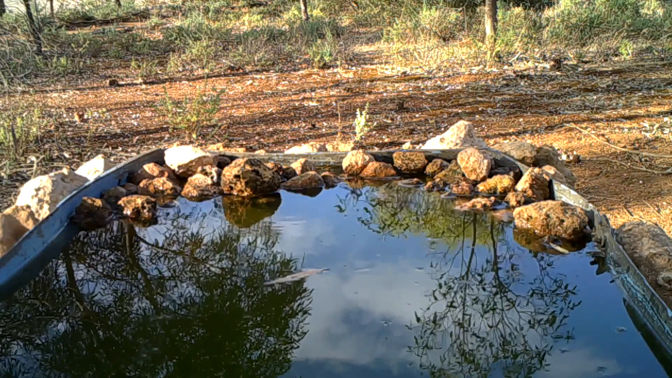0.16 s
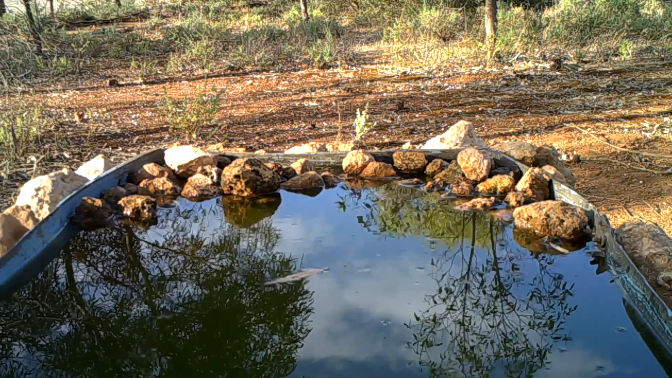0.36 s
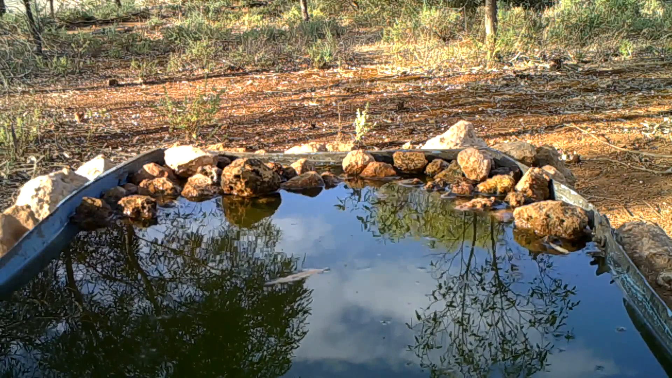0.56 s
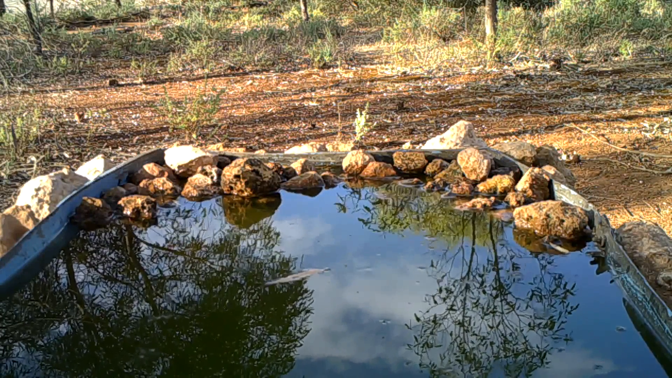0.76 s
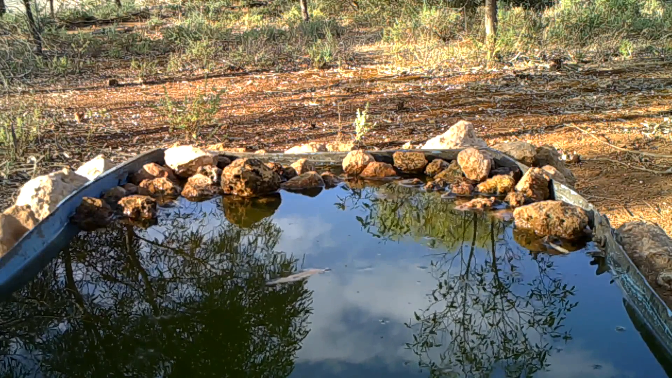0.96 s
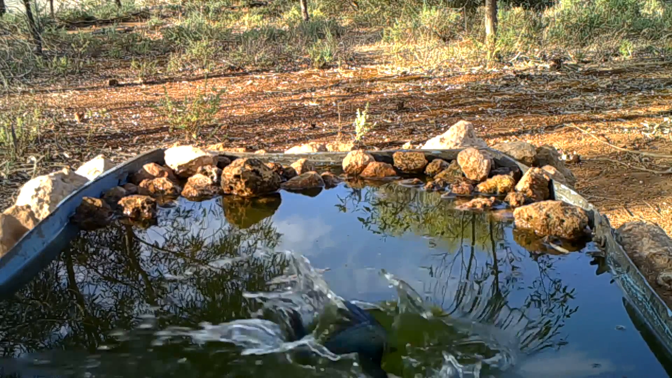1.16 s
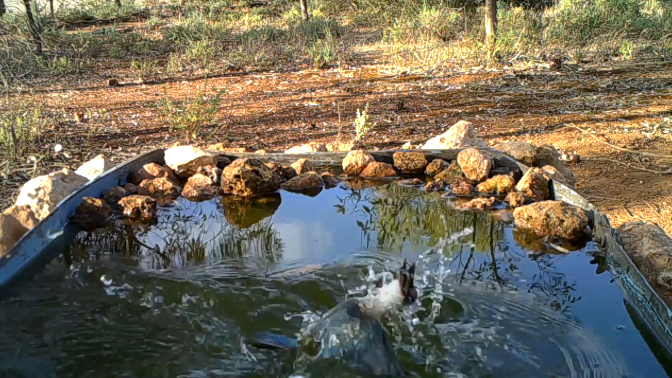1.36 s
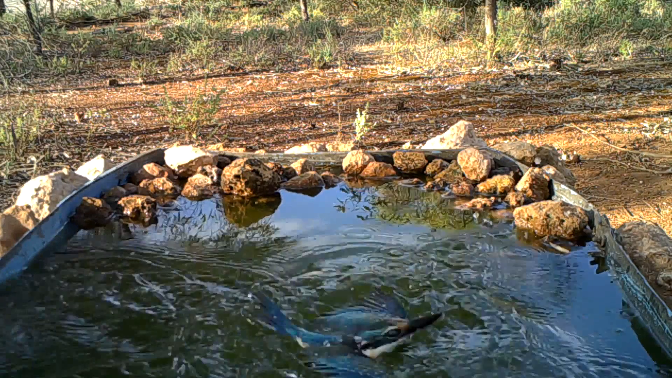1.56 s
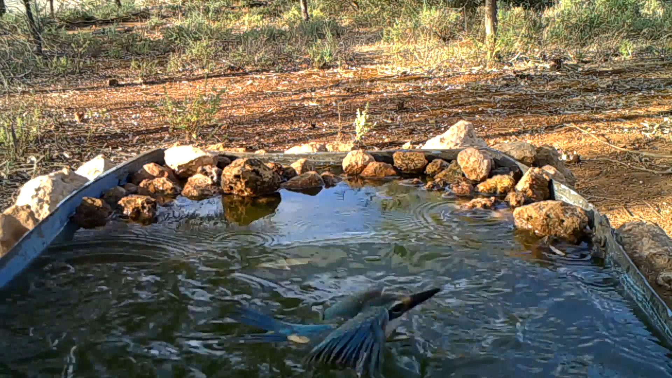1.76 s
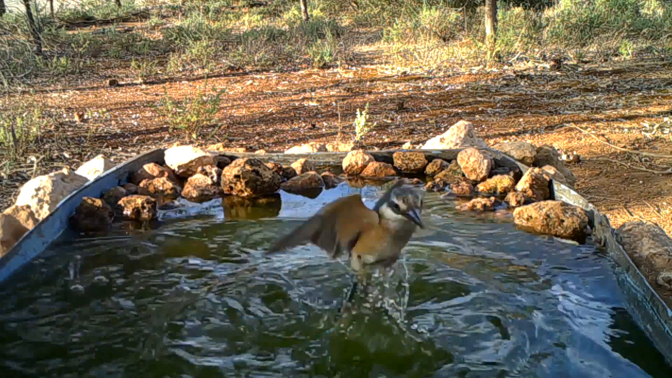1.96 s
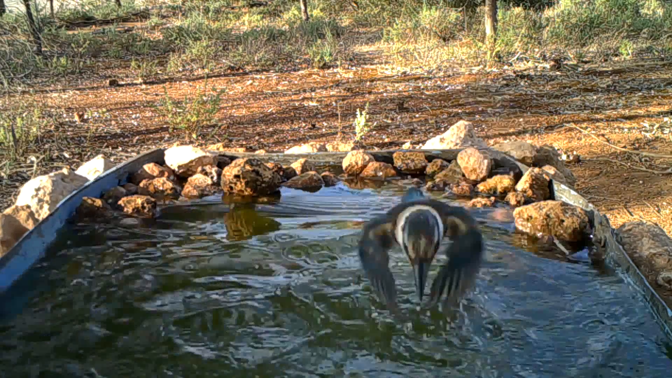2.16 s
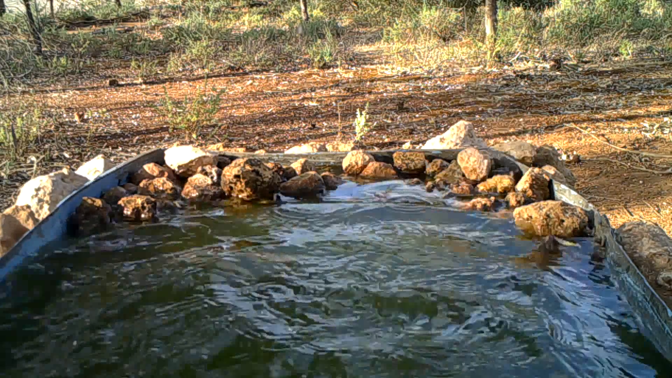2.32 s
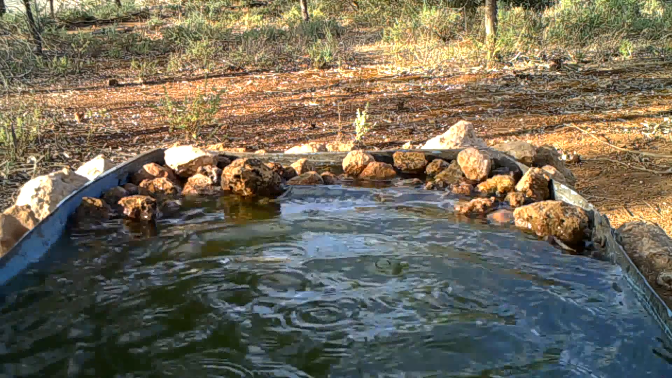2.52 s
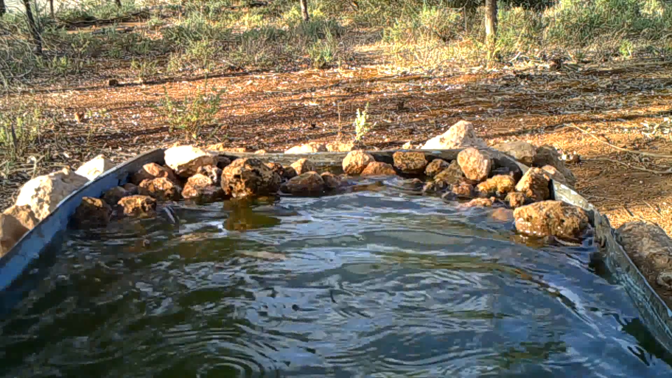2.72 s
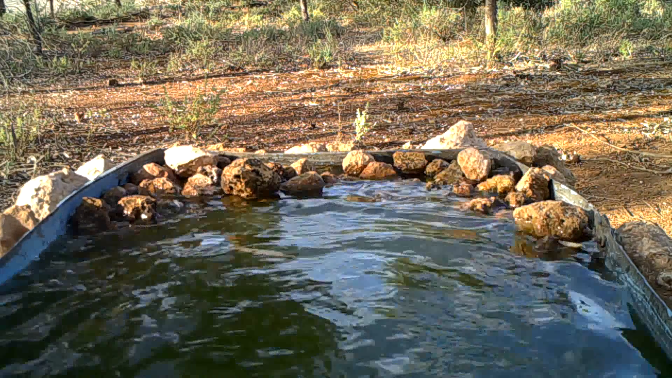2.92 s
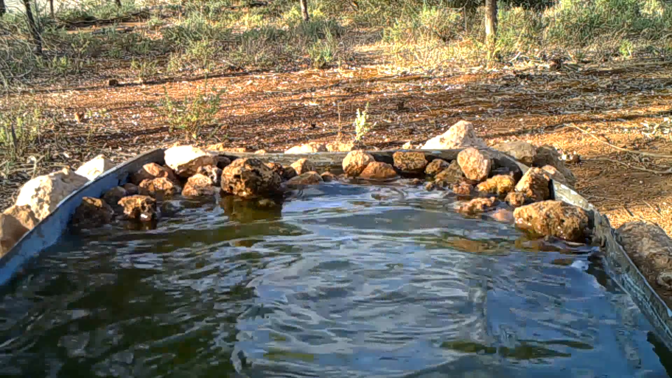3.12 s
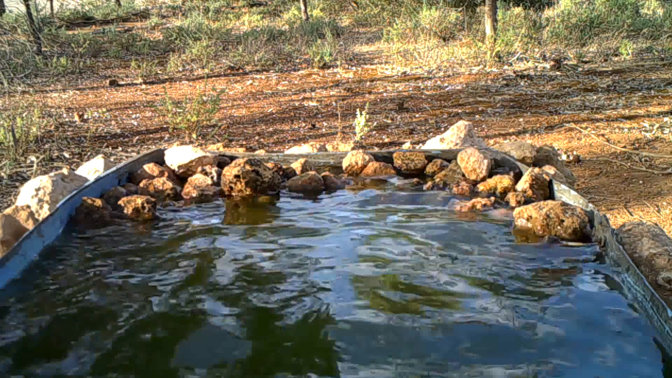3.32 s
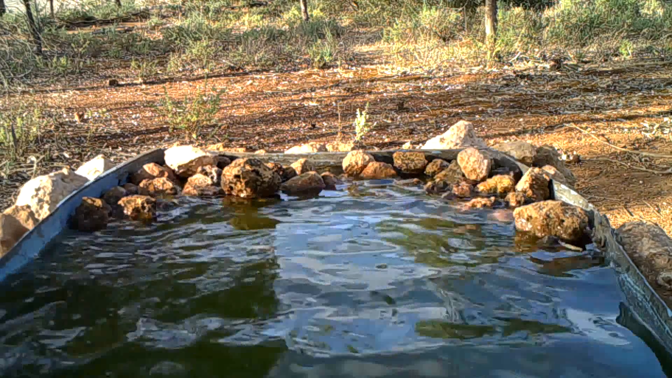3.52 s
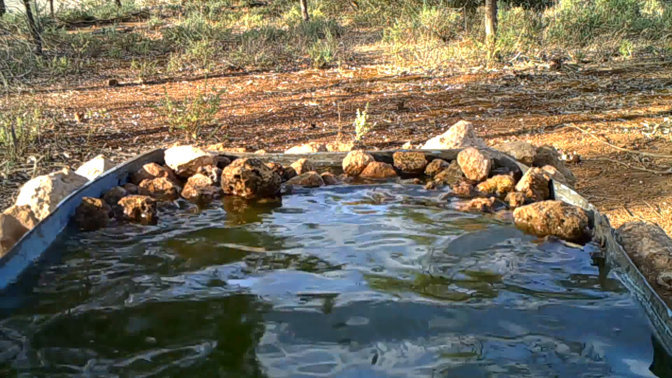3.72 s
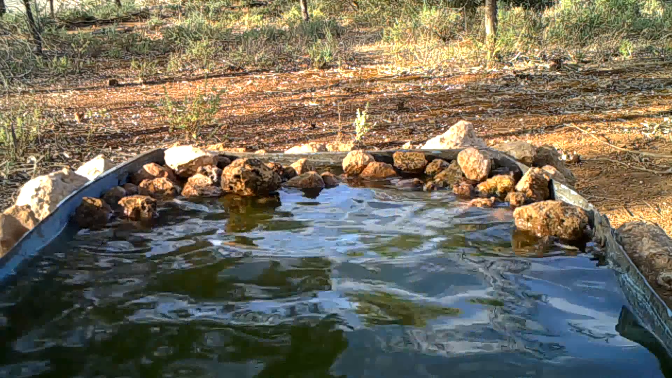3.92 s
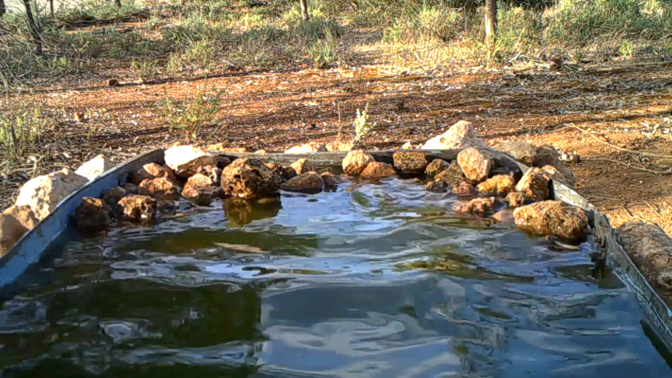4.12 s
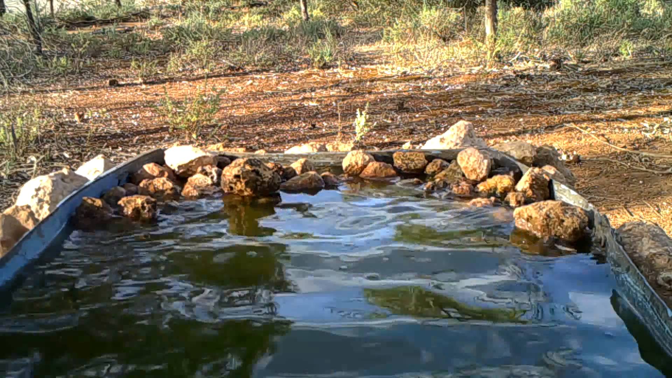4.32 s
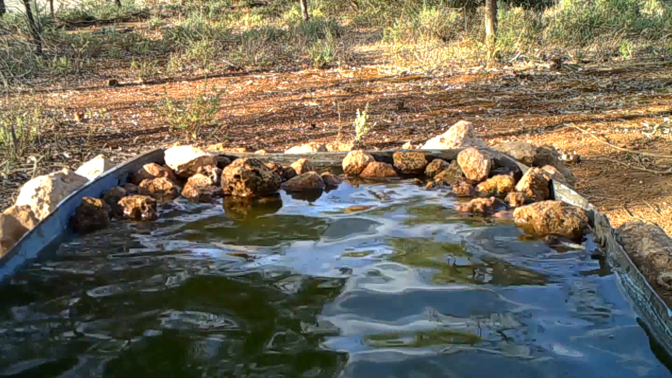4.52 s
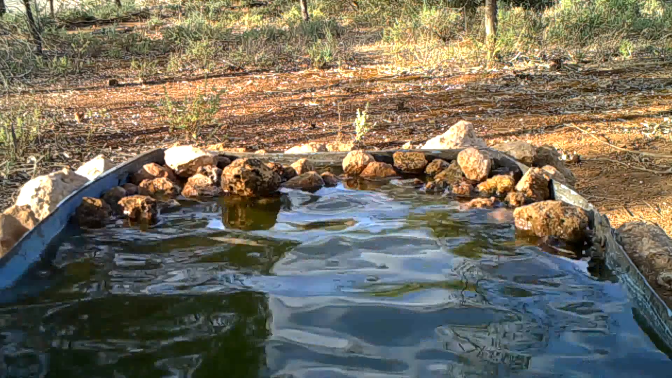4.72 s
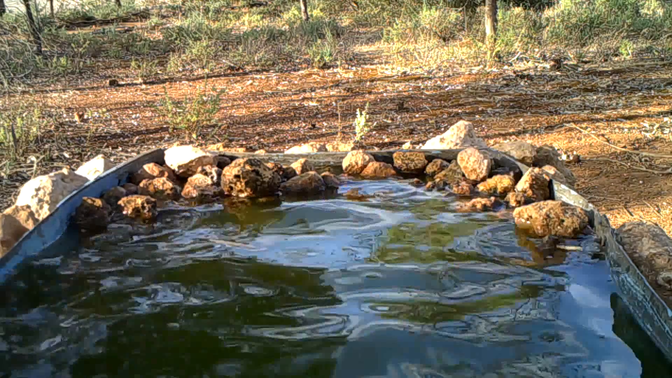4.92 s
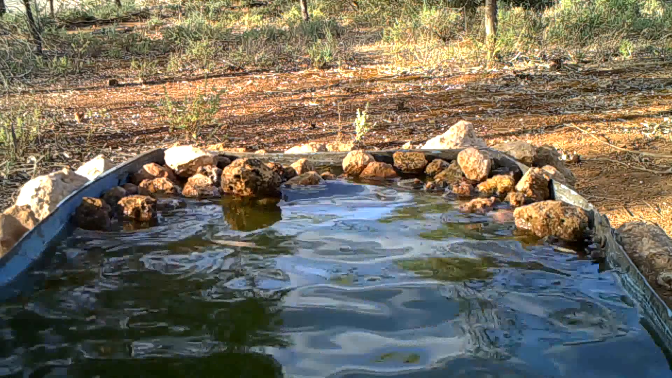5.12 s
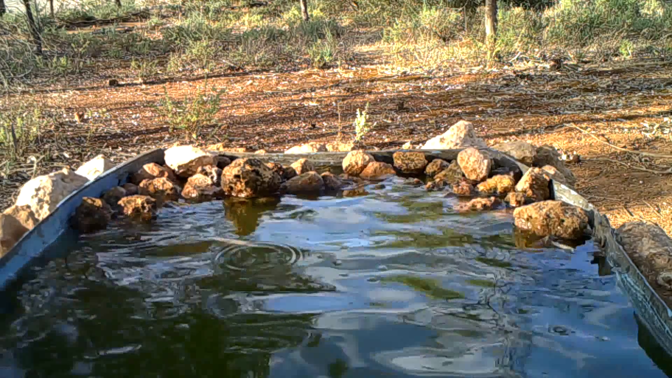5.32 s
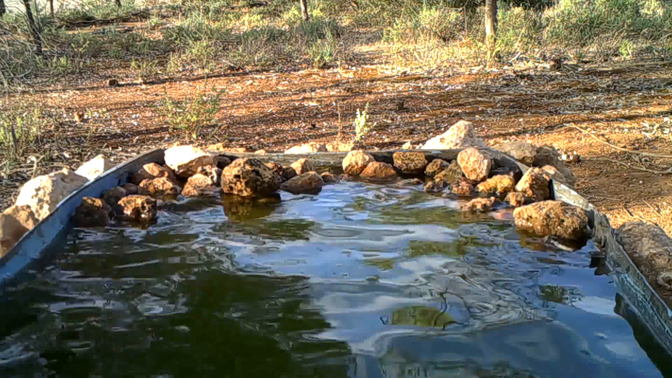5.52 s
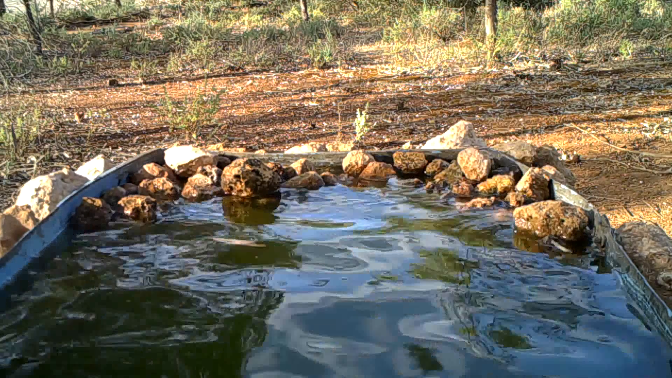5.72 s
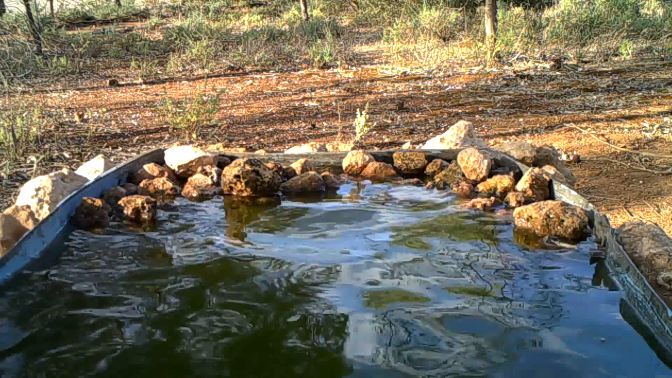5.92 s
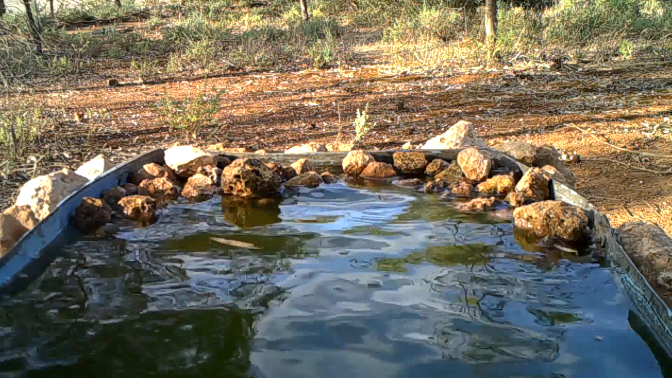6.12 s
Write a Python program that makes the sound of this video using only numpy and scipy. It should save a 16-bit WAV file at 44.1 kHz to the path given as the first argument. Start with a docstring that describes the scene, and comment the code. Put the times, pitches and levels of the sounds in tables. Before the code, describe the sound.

A bird plunges into a still water trough, thrashes and drips, bursts out past the microphone, then a loud sharp click and faint bird calls.

```python
"""A bird plunges into a water trough close to the microphone, thrashes, drips and flies out past it.
Bubbles are dying sines that rise in pitch, droplets are tiny rings, and spray is many random ticks.
Wing strokes are shaped noise with slow pushes of air; clicks ring the modes of a small hard body.
Underneath are coloured-noise hiss and wind, steady hum, a faint pulsing buzz and far birds' gliding tones.
"""
import sys
import numpy as np
from scipy import signal
from scipy.fft import rfft, irfft
from scipy.io import wavfile
from scipy.ndimage import uniform_filter1d

SR = 44100
rng = np.random.default_rng(int(sys.argv[2]) if len(sys.argv) > 2 else 0)


def dump(signal):
    """Clip the signal to [-1, 1] and save it as 16-bit WAV at the path in sys.argv[1]."""
    limited = np.clip(np.atleast_2d(signal).T, -1, 1)
    pcm = np.round(limited * 32767).astype(np.int16)
    wavfile.write(sys.argv[1], SR, pcm)


N = 272657


def gain_of(db):
    """Turns decibels into a plain multiplier."""
    return 10 ** (np.asarray(db) / 20)


def evened(x):
    """Scales a sound to an rms of 1."""
    return x / np.sqrt(np.mean(x ** 2) + 1e-20)


def add(mix, s, sound):
    """Adds a sound into the mix from s seconds on, cut off at the end of the mix."""
    part = mix[round(s * SR):][:len(sound)]
    part += sound[:len(part)]


def coloured(x, points):
    """Filters x by a spectrum of (Hz, dB) points and sets its rms to 1."""
    hz, db = np.transpose(points)
    axis = np.fft.rfftfreq(len(x), 1 / SR)
    filter_db = np.interp(np.log(axis + 1), np.log(hz + 1), db)
    return evened(irfft(rfft(x) * gain_of(filter_db), len(x)))


def unfold(rows):
    """Gives the start time and every column of a curve, sample by sample."""
    s, *columns = np.transpose(rows)
    t = np.arange(s[0], s[-1], 1 / SR)
    return s[0], [np.interp(t, s, c) for c in columns]


def glide(hz):
    """A sine that follows a pitch curve, with an rms of about 1."""
    return np.sqrt(2) * np.sin(2 * np.pi * np.cumsum(hz) / SR)


def bell(u, width):
    """A smooth hump around u = 0."""
    return np.exp(-.5 * (u / width) ** 2)


def ring(hz, t60, rise=0., onset=0.00025):
    """A sine that dies by 60 dB in t60 s; its pitch climbs by the share rise per second."""
    t = np.arange(4000) / SR
    turns = hz * (t + rise * t ** 2 / 2)
    fade = gain_of(-60 * t / max(t60, .001))
    return (1 - np.exp(-t / onset)) * fade * np.sin(2 * np.pi * turns)


def crackle(per_s, spread_db):
    """Sparse clicks of random sign, a few of them large."""
    size = gain_of(spread_db * np.minimum(rng.exponential(1, N), 4))
    sign = rng.choice([-1., 1.], N)
    return size * sign * (rng.random(N) < per_s / SR)


def ringing_crackle(per_s, spread_db, pitches, cycles, rise=0.):
    """Sparse clicks at each pitch, each ringing for the given number of cycles before it is 60 dB down."""
    return sum(signal.oaconvolve(crackle(per_s, spread_db), ring(hz, cycles / hz, rise))[:N]
               for hz in pitches)


# colour of the microphone hiss: (f/Hz, relative level/dB per Hz)
HISS_COLOUR = [(71, -34), (120, -4.5), (217, -7.5), (251, -8.5), (393, -11.5), (445, -13), (698, -13),
               (1010, -15), (2930, -19.5), (14700, -23), (16000, -23)]
# colour of the deep wind rumble: (f/Hz, relative level/dB per Hz)
RUMBLE_COLOUR = [(1.8, -50), (3.0, -1), (16, 0.5), (22, 2), (59, -3), (107, -7), (136, -22), (166, -16.5),
                 (250, -35.5), (320, -48), (550, -120)]
# colour of moving air, for wind flutter and wing eddies: (f/Hz, relative level/dB per Hz)
FLUTTER_COLOUR = [(50, -21), (110, 4), (200, -4), (350, -12), (800, -18), (2000, -22.5), (5000, -33)]
# wind at the microphone: (t/s, rumble level/dB, flutter level/dB)
WIND = [(0, -52.5, -85), (1, -51.5, -85), (2.15, -50, -66), (2.3, -39.5, -64), (2.45, -47.5, -69),
        (2.7, -51, -70), (3.8, -49, -72.5), (4.4, -51, -65.5), (5.251, -45, -61), (5.6, -48.5, -57.5),
        (6.18, -47.5, -54)]
# steady hum lines: (f/Hz, level/dB)
HUM_LINES = [(167, -70.5), (334, -75.5), (15192, -84)]
HISS_DB = -56


def background():
    """Steady hiss, wavering hum lines, and wind: a deep rumble plus a higher flutter in gusts."""
    t = np.arange(N) / SR
    s, rumble_db, flutter_db = np.transpose(WIND)
    hiss, rumble, flutter, waver = rng.standard_normal((4, N))
    wind = gain_of(np.interp(t, s, rumble_db)) * coloured(rumble, RUMBLE_COLOUR)
    wind += gain_of(np.interp(t, s, flutter_db)) * coloured(flutter, FLUTTER_COLOUR)
    # every hum line wanders by the same number of Hz
    drift_hz = 167 * 0.0054 * evened(uniform_filter1d(waver, size=8000))
    hum = sum(gain_of(db) * glide(hz + drift_hz) for hz, db in HUM_LINES)
    return gain_of(HISS_DB) * coloured(hiss, HISS_COLOUR) + wind + hum


# runs of evenly spaced buzz bursts: (first t/s, end t/s)
BUZZ_RUNS = [(.01, .05), (.211, 1.05), (1.21, 1.25)]
# harmonics of the buzz: (multiple of its f, relative level/dB)
BUZZ_HARMONICS = [(1, 1.5), (2, 5.5), (3, 2.5), (4, -1.5), (5, -7)]
BUZZ_HZ, BUZZ_EVERY_S, BURST_S = 1000, .1002, 0.028
BUZZ_DB, BUZZ_UNEVEN_DB = -70.5, 1.5


def buzz():
    """Short bursts of a harmonic tone, slightly uneven in level."""
    out, t = np.zeros(N), np.arange(round(BURST_S * SR)) / SR
    tone = sum(gain_of(db) * np.sin(2 * np.pi * k * BUZZ_HZ * t) for k, db in BUZZ_HARMONICS)
    burst = np.sqrt(2) * tone * signal.windows.tukey(len(t), .4)
    for first, end in BUZZ_RUNS:
        for s in np.arange(first, end, BUZZ_EVERY_S):
            add(out, s, gain_of(BUZZ_DB + BUZZ_UNEVEN_DB * rng.uniform(-0.84, 1)) * burst)
    return out


# dry clicks near the microphone: (t/s, level/dB, tilt/dB per octave)
CLICKS = [(0.0667, -30.5, 1), (0.0867, -29, 3), (0.126, -42, 0), (0.2429, -24.5, 2), (0.2604, -46, -2),
          (0.6284, -37, -4), (2.8524, -36.5, -6), (2.8574, -36, -18), (2.9007, -37, -12),
          (2.9513, -10.5, 6.5), (2.966, -36, -3), (3.763, -35, -2), (3.8193, -38, -2)]
# ringing modes of the small hard body: (f/Hz, relative level/dB, time to fall 60 dB/s)
CLICK_MODES = [(2580, 3, 0.0034), (3370, -5, 0.0086), (4530, 1, 0.0059), (5420, -1.5, 0.0078),
               (6120, -3.5, 0.0066), (7230, -8.5, 0.0084), (8000, -5, 0.0051), (9940, -8, 0.0078),
               (11250, -14.5, 0.0074), (13600, -10, 0.0023)]


def clicks():
    """A light touch, the main blow and a bounce into the modes of a small hard body, then one near reflection."""
    out = np.zeros(N)
    for s, db, tilt_db in CLICKS:
        body = np.zeros(4000)
        for k, (hz, mode_db, t60) in enumerate(CLICK_MODES):
            # the upper modes start in alternate directions and merge into one bright band
            direction = (-1) ** (k * (hz > 6500))
            tilted_db = mode_db + tilt_db * np.log2(hz / 5000)
            body += direction * gain_of(tilted_db) * ring(hz, t60, onset=.00005)
        body = gain_of(db) * body / abs(body).max()
        touch = abs(body).max() * ring(4990, 0.011, onset=0.00068)
        hits = ((.0006, -13.5, touch), (.0015, -3.5, body), (.0022, -29, body), (.0064, -21, body))
        for delay, hit_db, sound in hits:
            add(out, s + delay, gain_of(hit_db) * sound)
    return out


# spray thrown up while the bird thrashes, one table a bout: (t/s, level/dB, froth level over the spray/dB)
SPRAY_BOUTS = [
    [(1.26, -72, -1), (1.294, -54.5, 1), (1.39, -55.5, -5), (1.42, -60.5, 5), (1.57, -51, -3),
     (1.595, -58, 7), (1.616, -53, -2.5), (1.78, -64, -11)],
    [(2.05, -70, 1), (2.098, -51, -6), (2.14, -78, -21)],
    [(2.22, -57, -2), (2.26, -48.5, -14), (2.42, -65, -4)],
]
# colour of the fine spray: (f/Hz, relative level/dB per Hz)
SPRAY_COLOUR = [(1760, -9), (3000, -7), (4000, -10.5), (5920, -6), (12000, -9.5), (13900, -12),
                (16000, -23)]
# colour of the low froth: (f/Hz, relative level/dB per Hz)
FROTH_COLOUR = [(410, -47), (700, -13), (997, -12), (1280, -3), (3180, 3.5), (5000, -6), (6500, -41),
                (11000, -120)]
# surges of the thrashing: (t/s, extra level/dB, length/s)
SURGES = [(1.444, 16.5, 0.0057), (1.491, 12.5, 0.012), (1.557, 6, 0.025), (1.615, 10, 0.0056),
          (1.654, 6.5, .0085), (1.685, 5, .01)]


def spray():
    """Fine pitched ticks above, froth of small random bubbles below, both swelling with each surge."""
    t = np.arange(N) / SR
    ticks = ringing_crackle(70, 3.5, np.geomspace(3500, 15000, num=12), 22)
    ticks = evened(signal.lfilter([1, -1], [1], ticks))  # brighter
    fine = coloured(ticks + .75 * rng.standard_normal(N), SPRAY_COLOUR)
    froth = ringing_crackle(100, 3.5, np.geomspace(900, 4500, num=16), 22, 33.0)
    froth = coloured(evened(froth) + .08 * evened(crackle(1500, 4.)), FROTH_COLOUR)
    surge = gain_of(sum(db * bell(t - s, length) for s, db, length in SURGES))
    out = np.zeros(N)
    for rows in SPRAY_BOUTS:
        s, (db, froth_db) = unfold(rows)
        at = slice(round(s * SR), round(s * SR) + len(db))
        add(out, s, gain_of(db) * surge[at] * (fine[at] + gain_of(froth_db) * froth[at]))
    return out


# droplets hitting water and feathers: (t/s, level/dB, centre f/Hz, share of wide splat)
DROPS = [(1.265, -41, 5670, .4), (1.2714, -37, 9440, .6), (1.3024, -23, 7360, .6),
         (1.3084, -22.5, 8200, .5), (1.31, -24.5, 6000, .4), (1.3827, -25, 7150, .1),
         (1.3935, -24, 6740, .2), (1.397, -23, 6000, .4), (1.4453, -24.5, 10600, .3),
         (1.4514, -30, 5600, 0.45), (1.4565, -32, 8240, .6), (1.478, -26.5, 6600, .6),
         (1.485, -24.5, 8900, .5), (1.4942, -28, 8240, .3), (1.499, -29, 5800, .6), (1.5108, -30, 7000, .5),
         (1.5364, -35, 8200, .3), (1.5459, -30, 13600, .3), (1.5564, -32, 7800, .5),
         (1.5632, -22.5, 5720, .2), (1.593, -31, 5790, .25), (1.6067, -32, 10400, .5),
         (1.6147, -28, 6900, .6), (1.6891, -38, 8380, .5), (1.698, -39, 13800, .6),
         (1.714, -32.5, 7300, 0.55), (2.0125, -38, 5710, .3), (2.044, -36, 6300, .3),
         (2.084, -31, 8000, .4), (2.094, -34, 8190, .5), (2.0974, -30, 7150, .3),
         (2.1041, -22.5, 5500, 0.4), (2.1117, -32, 8340, .25), (2.2084, -36, 8150, .5),
         (2.252, -29.5, 5660, 0.66), (2.2887, -29, 4480, .2), (2.317, -25, 9900, .6),
         (2.4, -34, 6380, 0.33), (2.6489, -40.5, 11400, .4)]
DROP_T60_S = 0.0069


def droplets():
    """Each droplet is a tiny ring inside a cluster of briefer ones, the splat."""
    out = np.zeros(N)
    spread = 0.72 * rng.uniform(-1.13, 1, (len(DROPS), 6))
    for (s, db, hz, splat), octaves in zip(DROPS, spread):
        wide = sum(ring(min(hz * 2 ** octave, 15500), 0.51 * DROP_T60_S, onset=0.00017)
                   for octave in octaves)
        centre = 0.71 * ring(hz, DROP_T60_S, 7., onset=0.00029)
        add(out, s + .0005, gain_of(db) * (centre + splat * wide))
    return out


# short bubbles: (t/s, level/dB, f/Hz, time to fall 60 dB/s, share by which the pitch climbs in that time)
BUBBLES = [(1.28, -43, 1470, .03, .4), (1.287, -41, 1800, .02, .15), (1.311, -36, 4260, .012, .05),
           (1.333, -33, 1210, .011, .1), (1.346, -45, 3200, .04, .12), (1.396, -22.5, 2440, 0.035, .5),
           (1.416, -42, 3760, .03, .8), (1.416, -41, 2100, 0.025, .1), (1.431, -28.5, 1710, 0.013, .1),
           (1.4403, -32.5, 1575, 0.062, .1), (1.44, -32, 3600, 0.0061, .05),
           (1.444, -34.5, 2800, 0.03, .12), (1.457, -27.5, 1850, .017, .12),
           (1.4763, -37.5, 1060, .024, 0.37), (1.477, -37, 2420, 0.01, .2), (1.489, -33, 3090, 0.019, .14),
           (1.496, -31.5, 3310, 0.018, .07), (1.538, -38, 2350, .1, .3), (1.553, -35, 3350, .028, .05),
           (1.558, -34, 2000, 0.04, .1), (1.584, -43, 1650, .063, .55), (1.595, -35.5, 987, 0.048, .3),
           (1.596, -35.5, 1510, 0.049, 0.36), (1.612, -38, 2720, .027, .07), (1.642, -39, 2640, .02, .06),
           (1.649, -33, 3010, 0.022, .06), (1.685, -44, 2450, .04, .3), (1.715, -40.5, 1920, 0.014, .05),
           (1.811, -28.5, 770, 0.072, .055), (1.811, -37, 1740, .01, .03), (2.062, -45, 1684, 0.065, 0.27),
           (2.074, -39.5, 2320, 0.043, .1), (2.082, -39, 4300, .02, .14), (2.084, -29, 1926, .039, .025),
           (2.095, -31.5, 3160, 0.034, .09), (2.098, -34.5, 4200, .026, .2), (2.103, -42, 2640, .04, .1),
           (2.288, -30.5, 3110, 0.013, .1), (2.296, -32, 5400, .012, .04)]
# large air pockets that sing longer as they close, one table a pocket: (t/s, f/Hz, level/dB)
POCKETS = [
    [(1.813, 786, -47), (1.822, 890, -43), (1.835, 1150, -39.5), (1.85, 1510, -41.5), (1.862, 1870, -43),
     (1.871, 2500, -47.5), (1.88, 2920, -57)],
    [(2.151, 1216, -39), (2.165, 1136, -48.5), (2.177, 1140, -53), (2.19, 1400, -57)],
    [(2.209, 1720, -35), (2.217, 1610, -47.5), (2.228, 1900, -47), (2.233, 2280, -51), (2.238, 3000, -48),
     (2.243, 3000, -60)],
]


def bubbles():
    """Trapped air rings at its size; pitch climbs as it nears the surface, and ripples make its level waver."""
    out = np.zeros(N)
    for s, db, hz, t60, climb in BUBBLES:
        pinch = 0.69 * ring(2.03 * hz, 6 / hz)  # the neck of air snapping shut
        add(out, s, gain_of(db) * (ring(hz, t60, climb / t60, onset=0.38 / hz) + pinch))
    ripple = uniform_filter1d(uniform_filter1d(rng.standard_normal(N), size=70), size=70)
    out = out * gain_of(1.3 * evened(ripple))
    for rows in POCKETS:
        s, (hz, db) = unfold(rows)
        sample = np.arange(len(hz))
        edge = np.minimum(1, np.minimum(sample / 25.0, sample[::-1] / 200.))  # quick start, softer end
        add(out, s, gain_of(db) * edge * glide(hz))
    return out


# wing strokes at plunge, take-off and later: (t/s, hiss level/dB, thud level over the hiss/dB, fall/s)
STROKES = [(1.306, -39.5, -25, 0.0098), (2.2, -39.5, -7, .012), (2.256, -40, -6, .017),
           (2.317, -43, -9.5, .009), (2.38, -51, 1, 0.02), (2.528, -54, 9, 0.0031),
           (5.029, -57.5, 4, 0.021), (5.088, -53.5, -3, .009), (5.142, -51.5, -6, .02),
           (5.201, -53, -7, 0.0093), (5.247, -49.5, -6.5, 0.012), (5.297, -55, -7, 0.016),
           (5.346, -52.5, -10, .007), (6.06, -59, -10, .011)]
# colour of wet feathers: (f/Hz, relative level/dB per Hz)
WET_FEATHERS = [(180, -24), (300, -12.5), (2030, -7.5), (2360, -4.5), (4990, -7.5), (5610, -3.5),
                (10200, -6.5), (16000, -29)]
# colour of dry feathers: (f/Hz, relative level/dB per Hz)
DRY_FEATHERS = [(600, -13), (2500, 6.5), (7000, 3.5), (14000, 3.5), (16000, -26)]
# colour of the low wing thud: (f/Hz, relative level/dB per Hz)
THUD_COLOUR = [(300, -25), (800, -10), (1300, -3.5), (2500, -2), (5000, 9)]
# puffs of air from the nearest strokes: (t/s, level/dB, build-up/s)
PUSHES = [(2.251, -24, .007), (2.311, -24.5, .005), (2.347, -36, .003), (2.372, -24, .006),
          (5.238, -33, .0035), (5.334, -35, .0035)]
DRY_FROM_S, STROKE_RISE_S = 3, 0.0066


def wings():
    """Feathers hiss and thud on each downstroke; a puff of air builds on the membrane, lets go and eddies."""
    t, out = np.arange(N) / SR, np.zeros(N)
    wet = coloured(evened(crackle(1200, 3.7)) + 0.92 * rng.standard_normal(N), WET_FEATHERS)
    hiss = np.where(t < DRY_FROM_S, wet, coloured(rng.standard_normal(N), DRY_FEATHERS))
    thud = coloured(ringing_crackle(90, 3.4, np.geomspace(600, 2500, num=6), 12), THUD_COLOUR)
    eddies = coloured(rng.standard_normal(N), FLUTTER_COLOUR)
    for s, db, thud_db, fall in STROKES:
        u = t - s
        stroke = np.where(u < 0, bell(u, min(STROKE_RISE_S, fall)), np.exp(-np.abs(u) / fall))
        out += gain_of(db) * stroke * (hiss + gain_of(thud_db) * thud)
    for s, db, length in PUSHES:
        u = t - s
        build = bell(u, np.where(u < 0, length, 0.56 * length))
        # the air swings back the other way, then settles slowly
        recoil_width = np.where(u < 1.7 * length, 1.14 * length, 3 * length)
        recoil = 0.49 * bell(u - 1.2 * length, recoil_width)
        out += gain_of(db) * (build - recoil + 0.045 * eddies * bell(u, 0.021))
    return out


# two-note call, one table a note: (t/s from call start, f/Hz, relative level/dB, 2nd harmonic over it/dB)
CALL = [
    [(0, 2705, -9, -3), (.012, 2720, -11.5, -3), (.023, 2930, -9, -11)],
    [(.04, 3660, -13, -20), (.057, 3600, -14.5, -22), (.064, 2850, 0, -13), (.075, 2710, -8.5, -6.5),
     (.088, 2330, -6, -8)],
]
# when the call comes: (t/s, level/dB, extra second harmonic/dB, pitch drift/Hz per s)
CALL_TIMES = [(4.0, -46, -4, 1500), (4.207, -46, 3, -1500)]
# one long falling note: (t/s, f/Hz, level/dB, second harmonic over it/dB)
WHISTLE = [(3.14, 4800, -76, -30), (3.3, 4230, -70.5, -30), (3.7, 2880, -72, -30)]
# a buzzy far note, one table a strand: (t/s, centre f/Hz, level/dB)
BUZZY_NOTE = [
    [(3.885, 4700, -63), (3.92, 5050, -66), (3.98, 5150, -73)],
    [(3.9, 5600, -66), (3.96, 5550, -76), (4.01, 5530, -71), (4.02, 5350, -71), (4.04, 4700, -65)],
]


def far_birds():
    """Whistled notes, a little unsteady, with a second harmonic; the buzzy note is narrow bands of noise."""
    out, notes = np.zeros(N), []
    for s, db, extra_db, drift in CALL_TIMES:
        for note in CALL:
            notes.append([(s + u, hz + drift * u, db + rel_db, second_db + extra_db)
                          for u, hz, rel_db, second_db in note])
    for rows in notes + [WHISTLE]:
        s, (hz, db, second_db) = unfold(rows)
        flutter = gain_of(2.5 * evened(uniform_filter1d(rng.standard_normal(len(hz)), size=300)))
        tone = glide(hz) + gain_of(second_db) * glide(2 * hz)
        add(out, s, gain_of(db) * flutter * tone * signal.windows.tukey(len(hz), .3))
    for rows, width in zip(BUZZY_NOTE, (50, 200)):  # samples averaged: more makes a narrower band
        s, (hz, db) = unfold(rows)
        fuzz = evened(uniform_filter1d(rng.standard_normal(len(hz)), size=width))
        add(out, s, gain_of(db) * fuzz * glide(hz) * signal.windows.tukey(len(hz), .3))
    return out


def without_bass(x, hz):
    """Takes away the bass below hz, which small bodies cannot radiate."""
    return signal.sosfilt(signal.butter(2, hz, "highpass", fs=SR, output="sos"), x)


def scene():
    """Adds up all sources at one microphone."""
    steady = background() + buzz()
    hard = without_bass(clicks(), 1300)
    water = without_bass(spray() + droplets() + bubbles(), 620)
    return (steady + hard + water + wings() + far_birds())[None]


EDGE_HZ, OFFSET = 15800, 0.0049


def record(dry):
    """Cuts off the treble above the band edge and adds a small steady offset."""
    band = signal.firwin(1023, EDGE_HZ, window=("kaiser", 9), fs=SR)
    return signal.oaconvolve(dry, band[None], "same") + OFFSET


dry = scene()
out = record(dry)
dump(out)
```